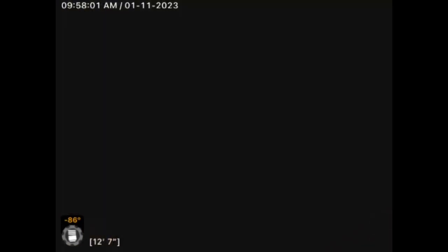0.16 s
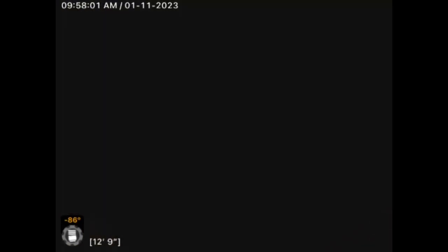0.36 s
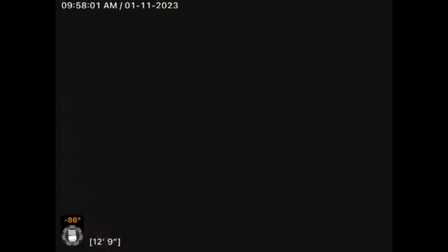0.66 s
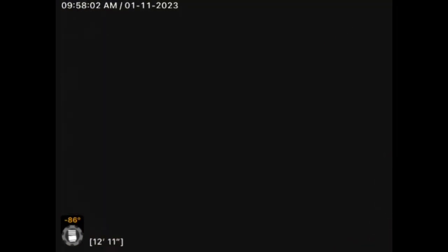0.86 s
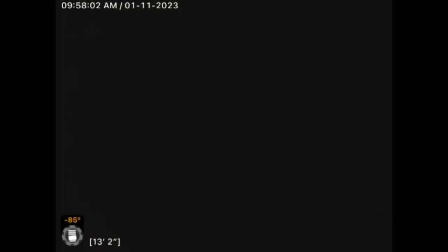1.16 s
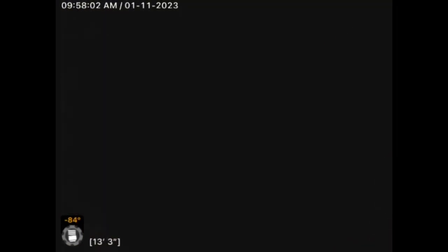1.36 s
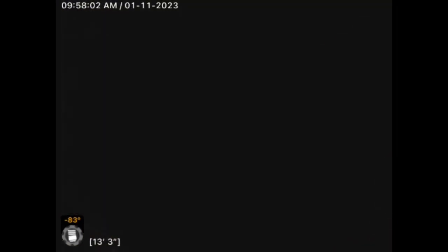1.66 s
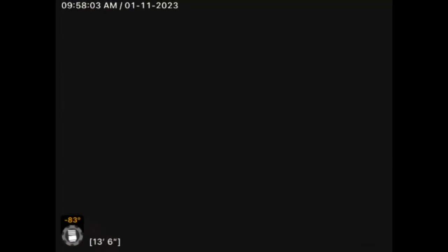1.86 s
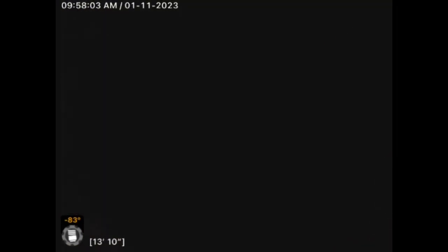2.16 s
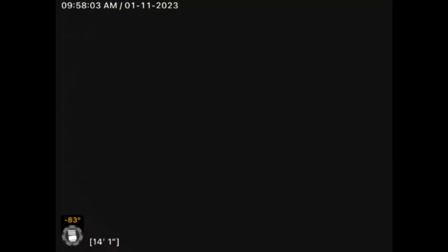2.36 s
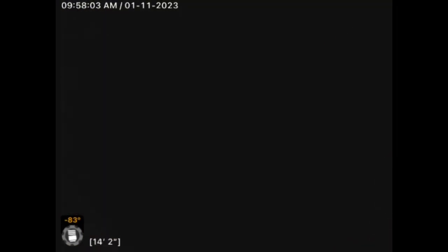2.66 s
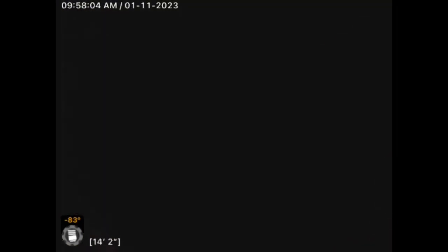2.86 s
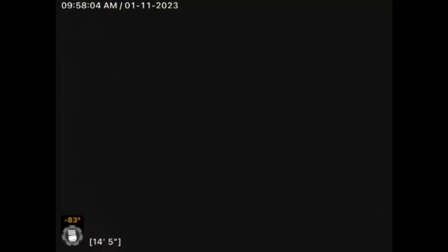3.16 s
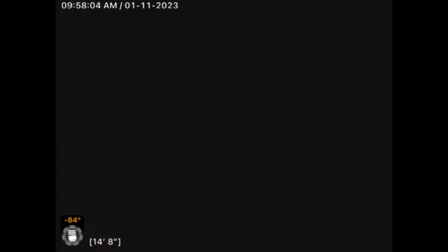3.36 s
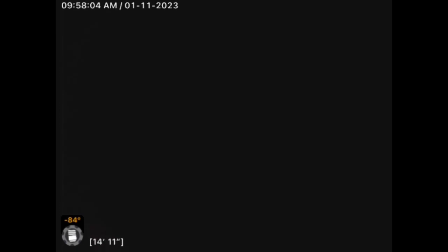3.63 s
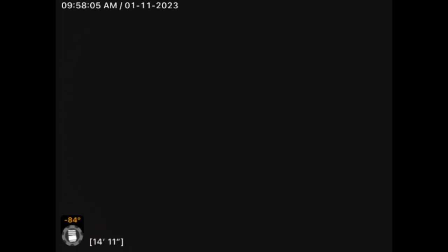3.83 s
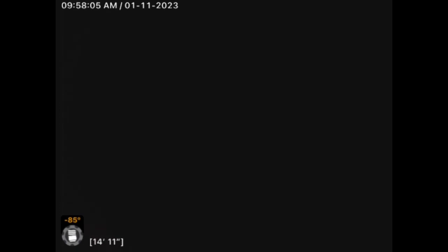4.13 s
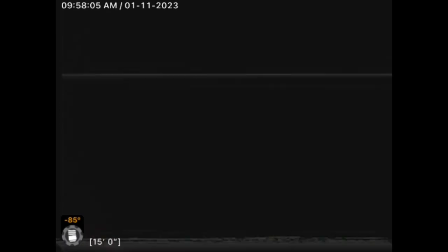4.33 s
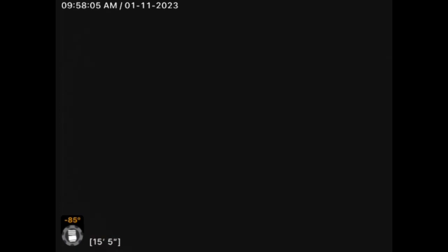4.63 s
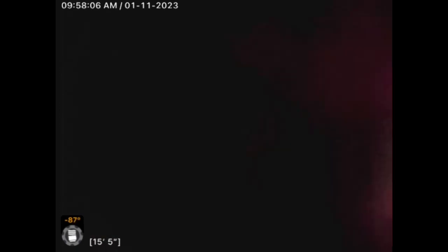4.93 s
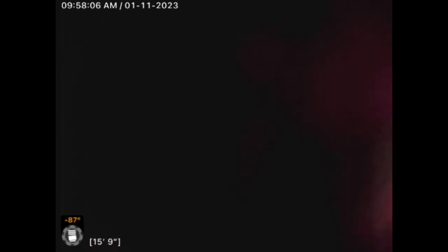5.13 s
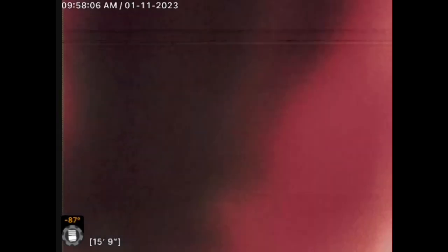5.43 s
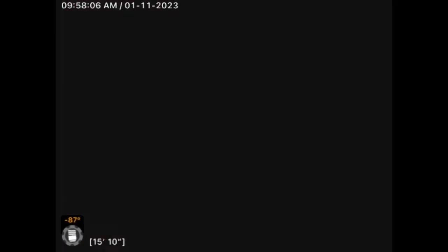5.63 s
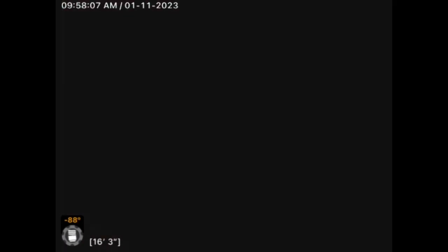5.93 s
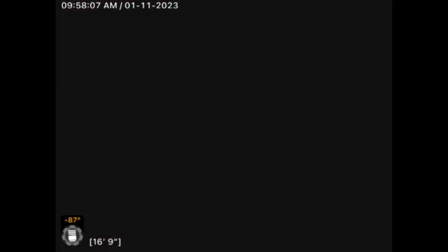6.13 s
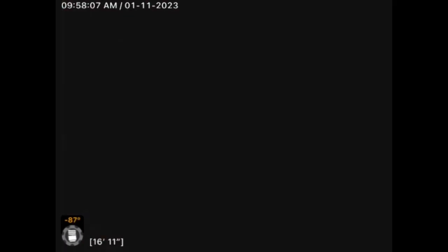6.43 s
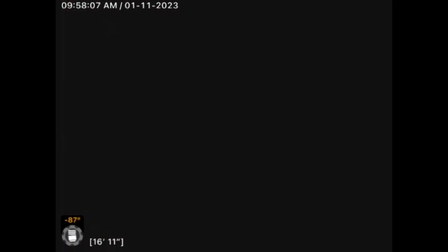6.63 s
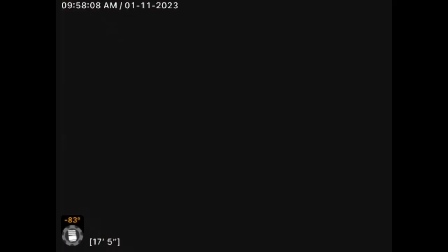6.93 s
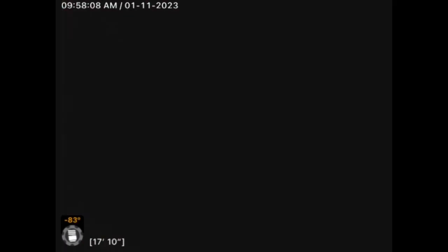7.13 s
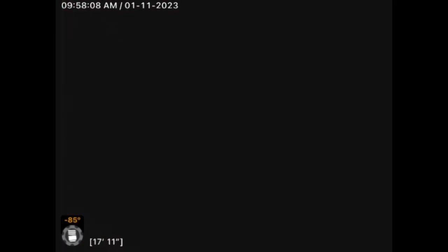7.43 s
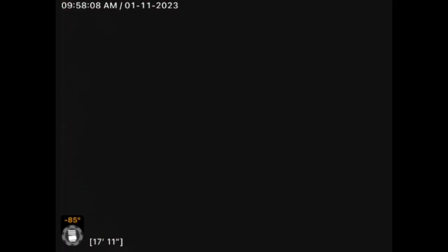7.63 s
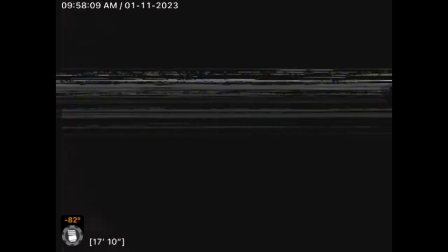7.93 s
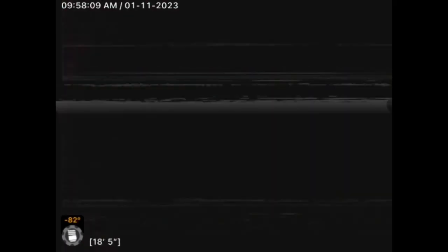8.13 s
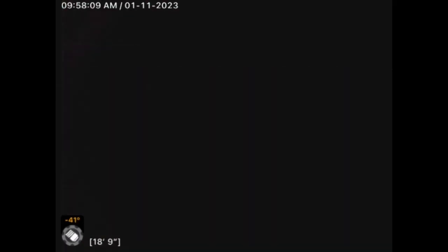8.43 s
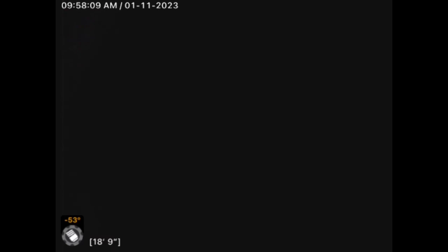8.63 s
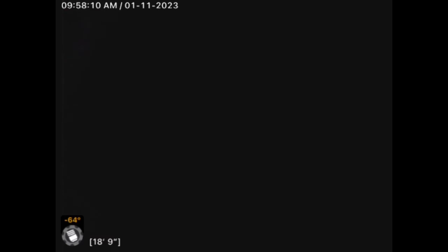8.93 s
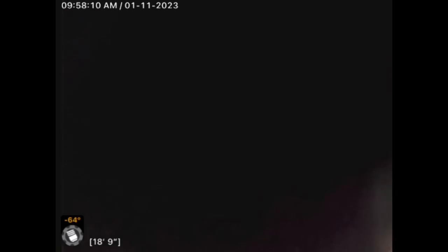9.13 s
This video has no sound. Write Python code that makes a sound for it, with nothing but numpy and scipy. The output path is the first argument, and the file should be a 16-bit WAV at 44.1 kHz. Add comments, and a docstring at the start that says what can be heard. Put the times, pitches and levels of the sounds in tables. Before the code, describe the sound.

A stiff camera cable is shoved down a drain pipe in uneven strokes, scraping, hissing, clicking and knocking over a steady low rumble.

```python
"""Cable pushed down a drain pipe

A stiff camera cable is shoved down a drain pipe in uneven strokes: filtered slip noise scrapes and hisses.
Clicks, knocks and scuffs are noise bursts dispersed as bending waves, so their treble arrives first.
Between pushes the hand slides back with a soft hiss of resonant noise; brief gliding tones squeak.
A low rumble of coloured noise lies under everything."""
import sys
import numpy as np
from scipy import signal
from scipy.fft import rfft, irfft, next_fast_len
from scipy.io import wavfile

SR = 44100
rng = np.random.default_rng(int(sys.argv[2]) if len(sys.argv) > 2 else 0)


def store_pcm(level_fs):
    """Save levels as 16-bit WAV."""
    pcm = np.round(np.clip(level_fs, -1, 1) * 32767).astype(np.int16)
    wavfile.write(sys.argv[1], SR, np.atleast_2d(pcm).T)


N = 409248
CUTOFF_HZ = 6800  # top of the microphone channel; bending delays count from here


def from_db(db):
    """Amplitude gain is ten to the power of level/20."""
    return 10 ** (np.asarray(db) / 20)


def rms_one(x):
    """Normalisation: dividing by the root mean square gives unit power."""
    return x / np.sqrt(np.mean(x ** 2) + 1e-20)


def drift(rate_hz):
    """Low-pass random process: white noise through two equal poles wanders slowly, with spread 1."""
    step = 40  # samples between computed points
    r = np.exp(-2 * np.pi * rate_hz * step / SR)
    noise = rng.standard_normal(N // step + 2002)
    slow = signal.lfilter([1], [1, -2 * r, r * r], noise)[2000:]  # drop the filter's start-up
    return np.interp(np.arange(N) / step, np.arange(len(slow)), rms_one(slow))


def coloured(x, spectrum):
    """Spectral shaping: gains interpolated over log frequency colour a steady sound; rms 1."""
    hz, db = np.transpose(spectrum)
    size = next_fast_len(N)
    bins = np.maximum(np.fft.rfftfreq(size, 1 / SR), 1)
    gain = from_db(np.interp(np.log(bins), np.log(hz), db))
    return rms_one(irfft(rfft(x, size) * gain, size)[:N])


def resonance(x, hz, width_hz):
    """Damped oscillator: a two-pole band-pass with gain 1 on top."""
    r = np.exp(-np.pi * width_hz / SR)
    zeros = np.array([1, 0, -1]) * (1 - r * r) / 2
    poles = [1, -2 * r * np.cos(2 * np.pi * hz / SR), r * r]
    return signal.lfilter(zeros, poles, x)


def body(x, share):
    """Modal resonance: each mode lifts its own narrow range and rings on briefly."""
    # resonances of the drain pipe: f/Hz, width/Hz, lift at full share/dB
    modes = [(310, 56, 7.5), (511.5, 23, 7.5), (744, 140, 9), (820, 30, 3.5), (896, 28, 8), (1140, 5.6, 1),
             (1650, 30, 6), (1712, 110, 7), (1990, 43, 4.5), (2360, 42, 5.5), (2650, 31, 0), (3190, 69, 9),
             (3432, 130, 12), (3755, 260, 9.5), (3990, 100, 7)]
    ringing = sum((from_db(db) - 1) * resonance(x, hz, width) for hz, width, db in modes)
    return x + share * ringing


def grains(per_s, spread_db, smooth):
    """Stick-slip friction: sparse tiny slips of uneven size lie over smooth rubbing noise."""
    sizes = from_db(spread_db * np.minimum(rng.exponential(1, N), 4))
    slips = sizes * rng.choice([-1, 1], N) * (rng.random(N) < per_s / SR)
    return rms_one(slips) + smooth * rng.standard_normal(N)


def bend(x, late_s, bass_hz):
    """Dispersion: bending waves travel with the root of frequency, so a click becomes a falling chirp."""
    hz = np.fft.rfftfreq(len(x), 1 / SR)
    # group delay is late_s * (sqrt(bass_hz / f) - sqrt(bass_hz / CUTOFF_HZ))
    cycles = late_s * (2 * np.sqrt(bass_hz * hz) - hz * np.sqrt(bass_hz / CUTOFF_HZ))
    return irfft(rfft(x) * np.exp(-2j * np.pi * cycles), len(x))


def stroke_db(start, end, rise_db_per_s, fall_db_per_s):
    """Sliding noise follows speed: the level ramps up, holds at 0 dB and ramps down."""
    t = np.arange(N) / SR
    return -rise_db_per_s * np.maximum(start - t, 0) - fall_db_per_s * np.maximum(t - end, 0)


def rumble(trim_db, rest_db, waver_db):
    """Background noise: powers add, so a swelling part rises over a constant floor."""
    # spectrum of the rumble: f/Hz, relative density/dB
    spectrum = [(20, -27.5), (35, -18.5), (50, -1), (65, 1), (100, -0.5), (150, -6.5), (210, -9.5),
                (300, -16), (420, -18.5), (520, -23.5), (1000, -25), (2000, -31.5), (4500, -44),
                (7000, -42.5)]
    # swelling part: t/s, level before trim/dB
    swell = [(0.0, -41.5), (0.36, -35), (0.62, -46.5), (1.83, -38), (1.86, -44), (5.25, -40), (6.36, -41.5),
             (6.56, -35.5), (7.16, -48), (7.49, -35), (7.62, -46), (7.68, -31), (7.91, -44), (8.86, -44),
             (9.1, -42), (9.28, -48)]
    level_db = np.interp(np.arange(N) / SR, *np.transpose(swell)) + trim_db
    level = np.hypot(from_db(rest_db), from_db(level_db))
    return level * from_db(waver_db * drift(6.2)) * coloured(rng.standard_normal(N), spectrum)


def sliding_back():
    """Sliding speed sets the hand's level in dB; the strongest stroke at each moment leads."""
    # the hand slides back: up to speed t/s, slowing from t/s, hiss level before trim/dB
    regrips = [(0.014, 0.106, -57), (0.72, 0.937, -53.5), (2.32, 2.552, -58), (3.427, 3.617, -57),
               (3.657, 3.79, -51.5), (4.626, 4.84, -49.5), (5.618, 5.647, -53.5), (5.776, 5.99, -48.5),
               (6.87, 7.086, -47), (8.342, 8.382, -59.5), (8.676, 8.7, -52), (9.006, 9.123, -46.5)]
    return np.max([db + stroke_db(start, end, rise_db_per_s=227, fall_db_per_s=178.5)
                   for start, end, db in regrips], axis=0)


def hand(level_db, roam, rub):
    """Friction noise with a moving resonance: the hiss has a broad hump that roams with the grip."""
    # spectrum of the sliding hand: f/Hz, relative density/dB
    spectrum = [(700, -35.5), (1400, 5.5), (1750, 5.5), (2200, 7), (2550, 5), (3200, 9), (3750, 4),
                (4500, 6.5), (5000, 4.5), (5800, 9), (6400, 6.5), (7000, -14)]
    hiss = rng.standard_normal(N)
    log_pitch = np.log(2600) + roam * drift(0.8)
    hump = np.zeros(N)
    # fixed resonances fade into one another as the pitch passes
    for hz in np.geomspace(1500, 5500, num=9):
        nearness = np.exp(-(6 * (log_pitch - np.log(hz))) ** 2)
        hump += resonance(hiss, hz, hz / 8) * nearness
    return from_db(level_db) * coloured(hiss + rub * hump, spectrum)


def pushing():
    """Sliding speed sets the scrape and hiss levels in dB; the strongest push at each moment leads."""
    # the cable slides forward: up to speed t/s, slowing from t/s,
    # scrape level before trim/dB, friction hiss level before trim/dB
    pushes = [(0.128, 0.67, -45.5, -53), (1.108, 1.228, -50, -52), (1.318, 1.385, -38, -42.5),
              (1.528, 1.786, -44, -48), (1.93, 2.10, -53.5, -60), (2.206, 2.585, -51.5, -61),
              (2.731, 2.882, -40.5, -45), (2.986, 3.126, -43.5, -48.5), (3.21, 3.33, -46.5, -65),
              (3.849, 4.057, -40, -45.5), (4.242, 4.342, -38.5, -45), (4.958, 5.102, -37.5, -43),
              (5.26, 5.53, -37.5, -44.5), (6.172, 6.283, -36, -43), (6.44, 6.54, -40.5, -52),
              (6.60, 6.68, -39, -43.5), (7.275, 7.46, -40, -44.5), (7.598, 7.792, -39, -48),
              (8.047, 8.146, -48, -56.5), (8.867, 8.963, -42.5, -55), (9.10, 9.206, -48.5, -55)]
    strokes = [(stroke_db(start, end, rise_db_per_s=173.5, fall_db_per_s=86.5), scrape, hiss)
               for start, end, scrape, hiss in pushes]
    scrape_db = np.max([shape + db for shape, db, _ in strokes], axis=0)
    hiss_db = np.max([shape + db for shape, _, db in strokes], axis=0)
    return scrape_db, hiss_db


def scraping(level_db, judder_db, bump_db):
    """Stick-slip excitation: small uneven slips and sparser bumps set the pipe's modes ringing."""
    # spectrum of the scrape: f/Hz, relative density/dB
    spectrum = [(90, -21), (180, -2.5), (300, 1.5), (420, 2), (560, -1.5), (850, -5.5), (1050, -4),
                (1350, -7), (2200, -12.5), (3200, -15), (7000, -44)]
    slips = grains(per_s=1200, spread_db=1.0, smooth=0.79) * from_db(judder_db * drift(25))
    bumps = bend(grains(per_s=45, spread_db=-0.5, smooth=0), late_s=0.00618, bass_hz=246.6)
    ringing = body(slips + from_db(bump_db) * bumps, share=0.82)
    return from_db(level_db) * coloured(ringing, spectrum)


def singing(level_db, waver_db):
    """Noise-driven modes: rubbing keeps a few narrow resonances ringing, each coming and going."""
    # faintly singing modes of the rubbed cable: f/Hz, width/Hz, level before waver and drive/dB
    modes = [(303, 9.2, -13.5), (755, 32, -13), (1175, 39, -11)]
    total = np.zeros(N)
    for hz, width_hz, db in modes:
        tone = rms_one(resonance(rng.standard_normal(N), hz, width_hz))
        total += from_db(db + waver_db * drift(14)) * tone
    return from_db(level_db) * total


def friction(level_db, judder_db):
    """Granular friction: dense slips of fine grit under the sliding jacket merge into a hiss."""
    # spectrum of the friction hiss: f/Hz, relative density/dB
    spectrum = [(900, -27.5), (1700, -6.5), (2700, 1.5), (3500, -6), (4500, -2), (5600, -0.5), (6300, -9),
                (7000, -15)]
    slips = grains(per_s=3500, spread_db=2.0, smooth=0.99) * from_db(judder_db * drift(30))
    return from_db(level_db) * coloured(body(slips, share=0.95), spectrum)


def strikes(rows, colour_db, *shared_t60):
    """Impact spectrum: each strike tilts its kind's colour; a short, high span gives less thump."""
    thump_db_per_octave, middle_span_hz = -14.5, 281
    for s, db, tilt_db, span_hz, contact_hz, *own_t60 in rows:
        # the tilt turns about the second range
        levels = db + np.array(colour_db) + tilt_db * (np.arange(len(colour_db)) - 1.0)
        levels[0] += thump_db_per_octave * np.log2(span_hz / middle_span_hz)
        t60, = own_t60 or shared_t60
        yield s, levels, t60, span_hz, contact_hz


def travelling_blows(blows, late_s, first_blow, bass_hz, tail_db, tail_t60, swell,
                     span_ring, span_q, contact_ring, contact_width_hz):
    """Dispersive impact: a blow and its dying chatter run along the cable; the lows keep more tail."""
    # edges of the thump, knock, clack and tick ranges: f/Hz
    edges_hz = [110, 400, 1200, 3000, 7000]
    out, t = np.zeros(N + SR), np.arange(SR // 4) / SR
    ranges = list(zip(edges_hz, edges_hz[1:]))
    filters = [signal.butter(4, edges, "band", fs=SR, output="sos") for edges in ranges]
    for s, levels, t60, span_hz, contact_hz in blows:
        # longer chatter swells more slowly and begins with a weaker clean blow
        attack = 1 - np.exp(-t / (swell * t60))
        hardness = min(1, 0.066 / t60) ** 2
        # the free span of cable rings once the slow bass has arrived
        kick = bend(signal.unit_impulse(len(t)), late_s, bass_hz)
        note = span_ring * resonance(kick, span_hz, span_hz / span_q)
        at = round(s * SR)
        for sos, (low, _), db in zip(filters, ranges, levels):
            bassy = 1 / (1 + low / 1200)
            decay = from_db(-60 * t / t60)
            tail = bassy * from_db(tail_db - 60 * t / tail_t60)
            contact = rng.standard_normal(len(t)) * attack * (decay + tail)
            contact /= np.linalg.norm(contact)
            contact[0] += first_blow * hardness * bassy
            wave = body(bend(contact, late_s, bass_hz), share=0.38)
            contact_note = contact_ring * resonance(wave, contact_hz, contact_width_hz)
            wave = signal.sosfilt(sos, wave + note + contact_note)
            # a level is the wave's energy as if spread over 10 ms
            out[at:at + len(t)] += from_db(db) * wave / np.linalg.norm(wave) * np.sqrt(SR / 100)
    return out[:N]


def scuffs():
    """Prolonged contact: slowly swelling chatter is drawn out along the cable."""
    # scuffs: t/s, level before colour/dB, tilt per range/dB, free span f/Hz, contact f/Hz, chatter t60/s
    events = [(0.157, -29.5, -0.5, 444, 1950, 0.18), (0.19, -31, 0, 319, 2010, 0.026),
              (0.364, -24, 0, 503, 2160, 0.14), (2.739, -37, -2, 307, 1690, 0.13),
              (3.02, -38, 0.5, 254, 1700, 0.23), (3.856, -25, -8, 650, 1630, 0.087),
              (4.941, -39, -2, 302, 1680, 0.058), (5.8145, -32.5, -0.5, 285, 1950, 0.054),
              (6.118, -31, 1, 305, 3480, 0.093), (6.229, -26, 1, 284, 1510, 0.074),
              (6.542, -24, 0.5, 293, 1900, 0.11), (7.6654, -32, -2.5, 313, 1290, 0.04),
              (8.704, -39.5, -4, 423, 3000, 0.051), (8.86, -35, -3, 485, 1700, 0.099),
              (8.934, -26, 1, 503, 1680, 0.058)]
    # thump, knock, clack and tick ranges: level before tilt, against the scuff/dB
    colour_db = [6.5, -1.5, -6, -17]
    return travelling_blows(strikes(events, colour_db), late_s=0.00499, first_blow=0.53, bass_hz=247,
                            tail_db=-18, tail_t60=0.23, swell=0.099, span_ring=6.2, span_q=30,
                            contact_ring=0.92, contact_width_hz=140)


def clicks():
    """Hard impact: a short contact excites the treble ranges strongly."""
    # clicks: t/s, level before colour/dB, tilt per range/dB, free span f/Hz, contact f/Hz
    events = [(0.3836, -8.5, -7, 716, 2120), (0.4736, -45.5, 1.5, 397, 2500),
              (0.645, -32.5, -0.5, 249, 5300), (1.507, -24, -0.2, 398, 2520),
              (2.613, -21.5, -0.2, 175, 5920), (2.9604, -42, -3.5, 201, 3350), (3.2555, -49, 0, 400, 4050),
              (4.0407, -29.5, 1, 564, 2820), (4.18, -39, 0.5, 370, 4300), (4.271, -25, 0.8, 386, 2010),
              (5.128, -40.5, 4, 754, 5600), (5.2655, -23.5, 1.6, 232, 5560), (5.554, -33, -1, 274, 5970),
              (6.4807, -23, 0, 305, 2480), (6.492, -26, -4.5, 275, 1650), (6.7901, -40.5, -1.3, 408, 2850),
              (6.808, -41, 0, 195, 5250), (7.4474, -19.5, -2, 183, 3390), (7.769, -33, -1.5, 205, 4430),
              (8.019, -38.5, -5, 338, 1600), (8.107, -35.5, 3.5, 234, 3270), (8.4474, -32, 1.2, 280, 6240),
              (8.676, -36.5, -4.5, 410, 1690), (8.785, -41, -2, 490, 2450), (8.8325, -42, 1, 595, 2880),
              (8.855, -34, -4, 497, 3340), (8.9218, -35, -3, 523, 3360), (8.9927, -39.5, -2, 573, 5200),
              (9.1258, -42, 2.5, 300, 4060), (9.1477, -38, 1.0, 253, 2520)]
    # thump, knock, clack and tick ranges: level before tilt, against the click/dB
    colour_db = [-6.5, -0.5, 0, 0.5]
    t60_s = 0.023
    return travelling_blows(strikes(events, colour_db, t60_s), late_s=0.004435, first_blow=0.59,
                            bass_hz=248.3, tail_db=-12.5, tail_t60=0.11, swell=0.038, span_ring=2.65,
                            span_q=11, contact_ring=1.8, contact_width_hz=340)


def knocks():
    """Dull impact: little treble and a strongly ringing free span sound hollow."""
    # knocks: t/s, level before colour/dB, tilt per range/dB, free span f/Hz, contact f/Hz
    events = [(0.394, -19.5, -2, 303, 2090), (1.4788, -26.5, -13, 707, 1300), (3.322, -40, -10, 470, 2000),
              (3.867, -26.5, 6, 300, 1540), (3.8738, -19.5, -1.2, 280, 1550), (4.226, -28, -2.7, 275, 2000),
              (5.0912, -31, -0.5, 720, 1280), (6.138, -29, -6.5, 466, 3380), (6.2034, -27, 1.5, 306, 1450),
              (6.2127, -21, 0, 485, 1500), (6.455, -34, -13, 393, 1300), (6.5535, -12.5, -0.8, 483, 1870),
              (6.576, -27, -1, 266, 1500), (7.5357, -30.5, 4, 292, 1660), (7.592, -36, -1.5, 410, 2110),
              (8.1754, -38, 1.5, 400, 3320), (8.884, -36, -2, 487, 1290)]
    # thump, knock, clack and tick ranges: level before tilt, against the knock/dB
    colour_db = [-2.5, 0, -2, -18.5]
    t60_s = 0.02
    return travelling_blows(strikes(events, colour_db, t60_s), late_s=0.00691, first_blow=0.84,
                            bass_hz=247, tail_db=-19, tail_t60=0.15, swell=0.074, span_ring=6.1,
                            span_q=25, contact_ring=1.8, contact_width_hz=200)


def squeaks(jitter):
    """Periodic stick-slip: for a moment the slips lock into an unsteady gliding tone."""
    # squeaks of the jacket: t/s, length/s, start f before jitter/Hz, end f before jitter/Hz, peak level/dB
    events = [(3.768, 0.048, 1475, 1480, -43), (4.305, 0.051, 1235, 1150, -32),
              (5.702, 0.027, 3820, 6160, -47)]
    out, wobble = np.zeros(N), 1 + jitter * drift(150)
    for s, length_s, start_hz, end_hz, db in events:
        span = slice(round(s * SR), round((s + length_s) * SR))
        hz = np.geomspace(start_hz, end_hz, span.stop - span.start) * wobble[span]
        tone = np.sin(2 * np.pi * np.cumsum(hz) / SR)
        out[span] += from_db(db) * np.hanning(len(hz)) * tone
    return out


def scene():
    """Superposition: rumble, sliding hand, pushed cable, impacts and squeaks add linearly."""
    background = rumble(trim_db=-1.0, rest_db=-43.5, waver_db=0.06)
    slide = hand(sliding_back() + 2.0, roam=0.37, rub=0.38)
    scrape_db, hiss_db = pushing()
    scrape = scraping(scrape_db + 1.0, judder_db=3.0, bump_db=-4)
    song = singing(scrape_db + 0.5, waver_db=2.5)
    hiss = friction(hiss_db + 3.0, judder_db=1.2)
    hits = scuffs() + clicks() + knocks()
    return (background + slide + scrape + song + hiss + hits + squeaks(jitter=0.024))[None]


def record(dry):
    """Saturation and band limiting: a microphone channel rounds tall peaks and cuts the top steeply."""
    held = dry / (1 + (dry / .8) ** 6) ** (1 / 6)
    # ninth order, 0.3 dB ripple in the pass band, 62 dB down in the stop band
    return signal.sosfilt(signal.ellip(9, .3, 62, CUTOFF_HZ, fs=SR, output="sos"), held)


dry = scene()
out = record(dry)
store_pcm(out)
```